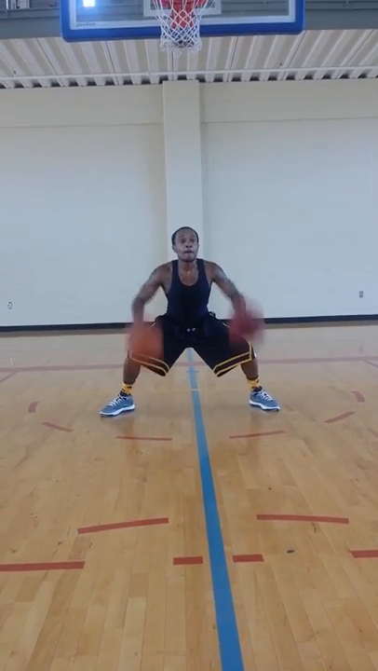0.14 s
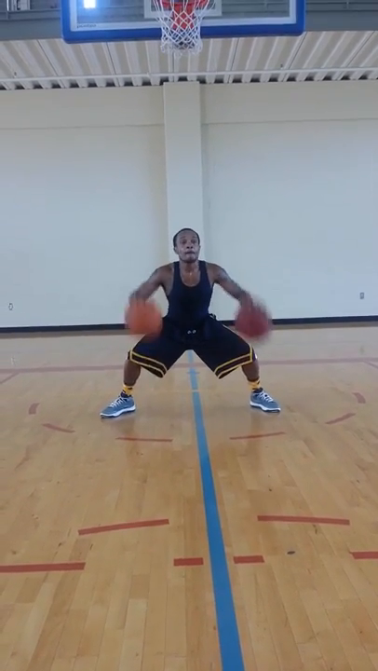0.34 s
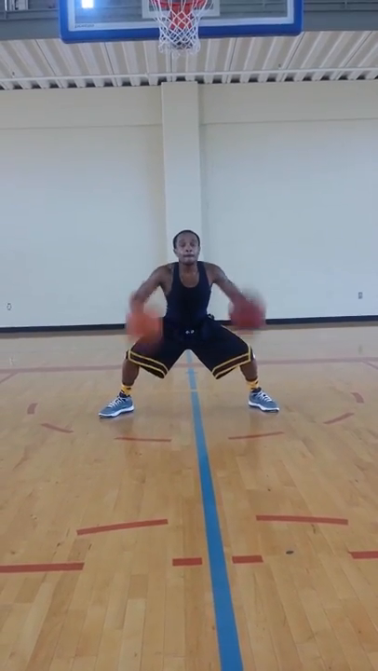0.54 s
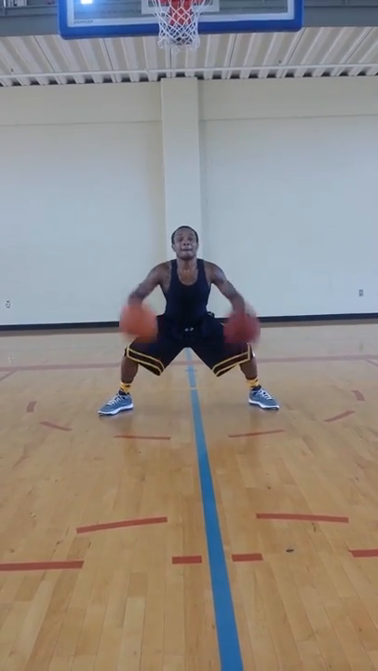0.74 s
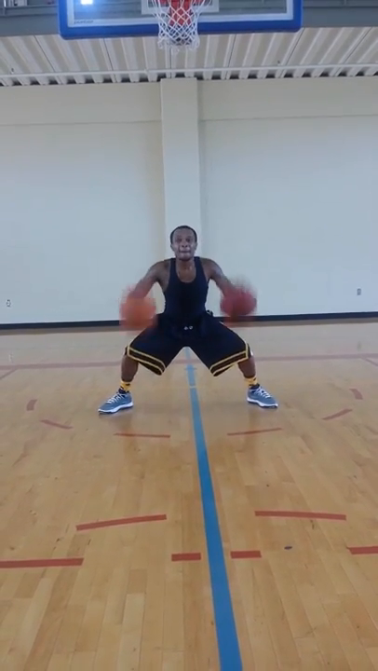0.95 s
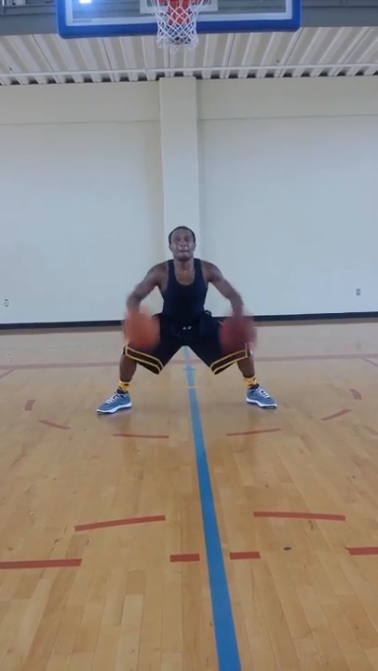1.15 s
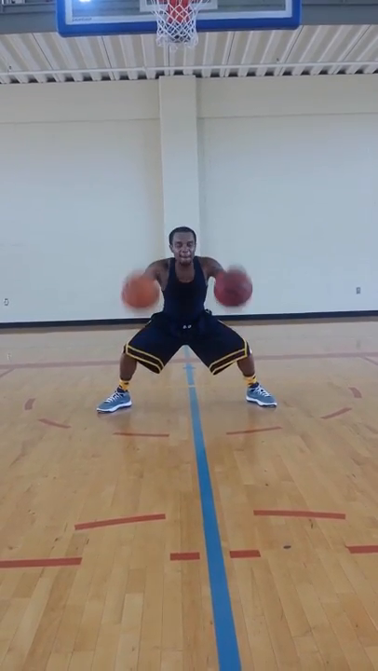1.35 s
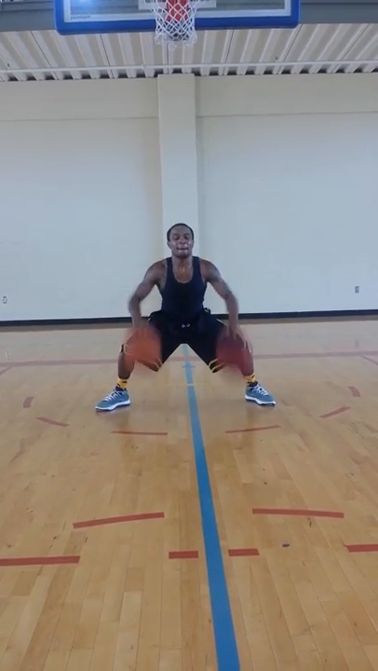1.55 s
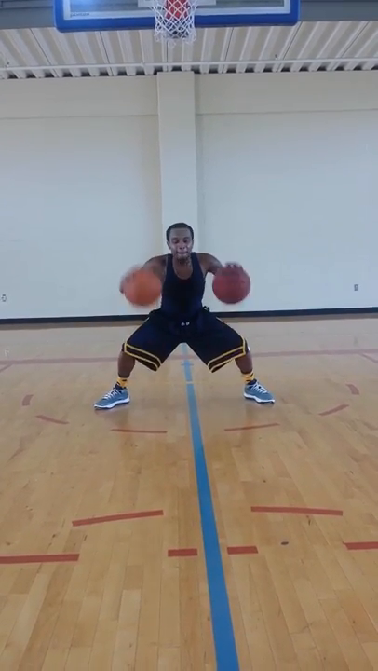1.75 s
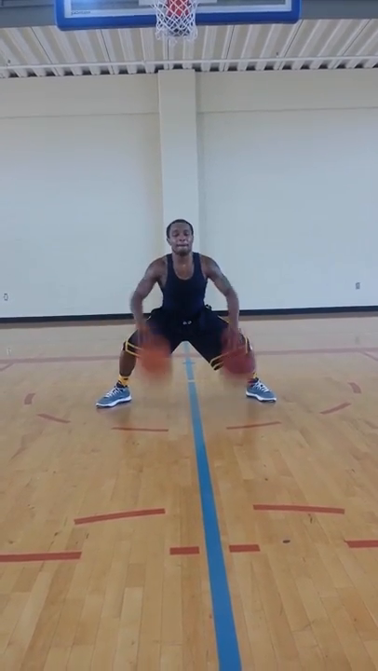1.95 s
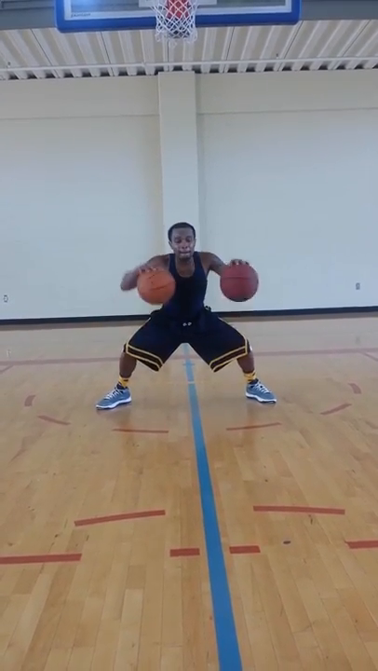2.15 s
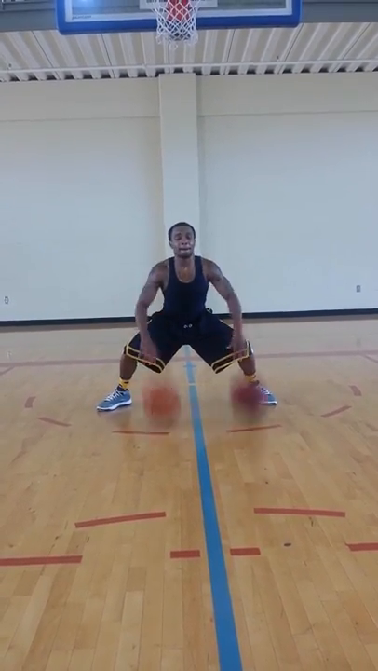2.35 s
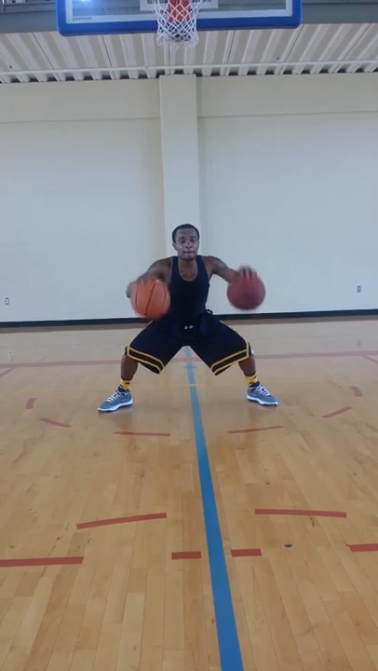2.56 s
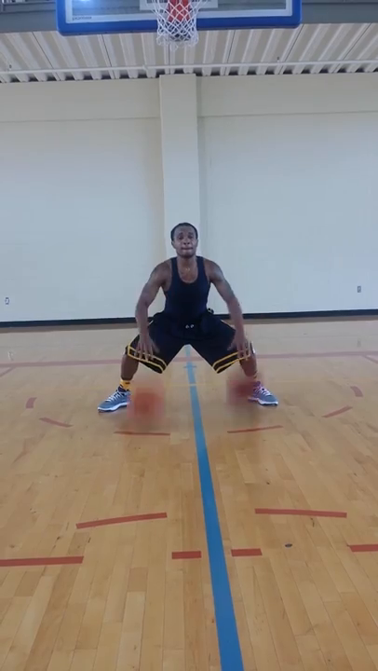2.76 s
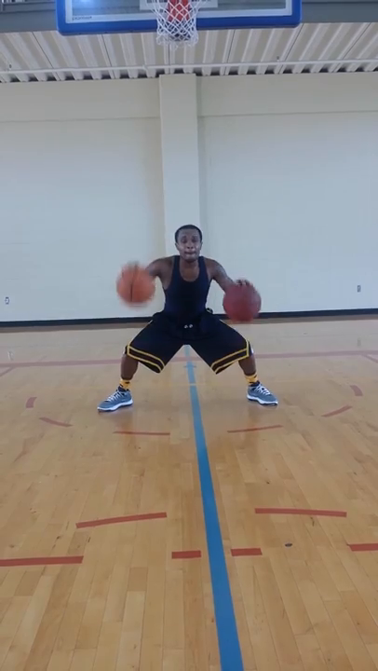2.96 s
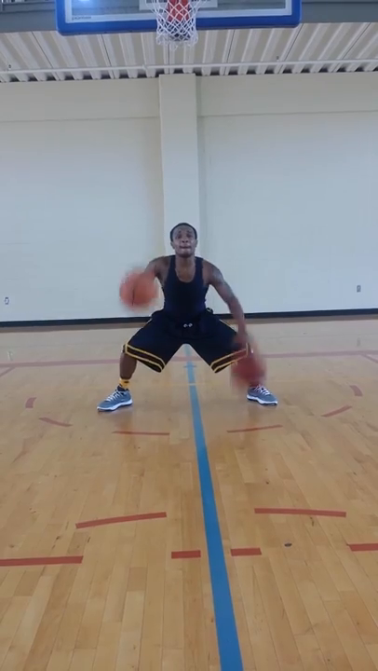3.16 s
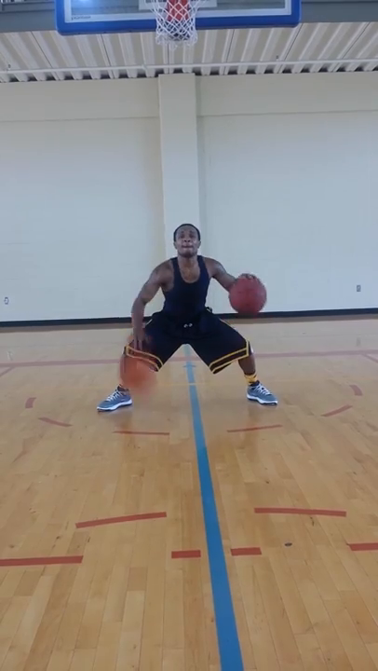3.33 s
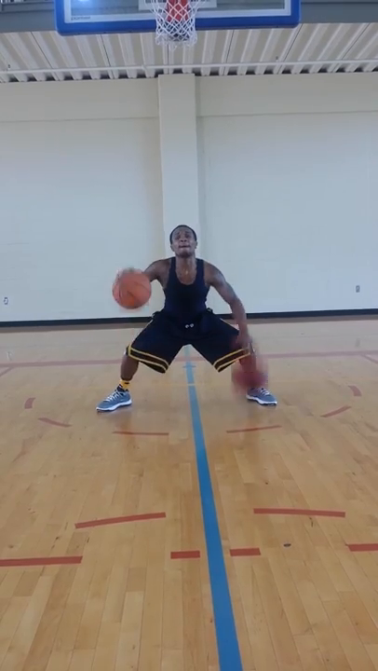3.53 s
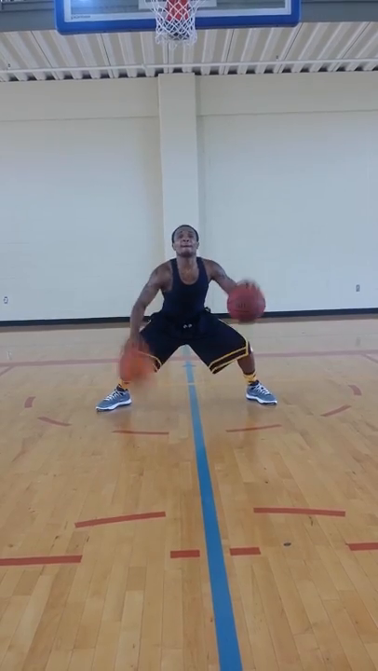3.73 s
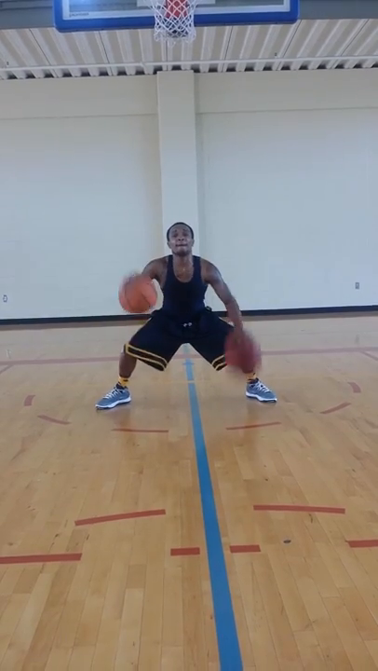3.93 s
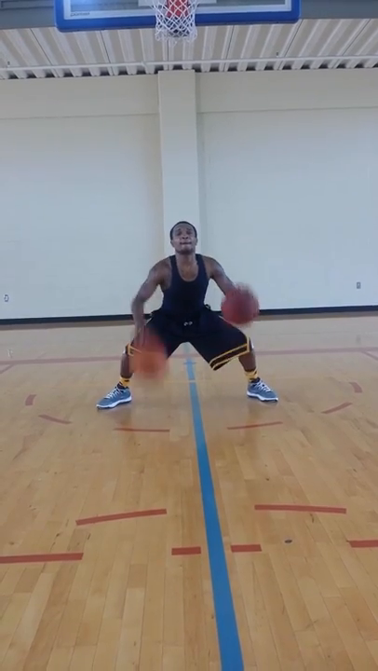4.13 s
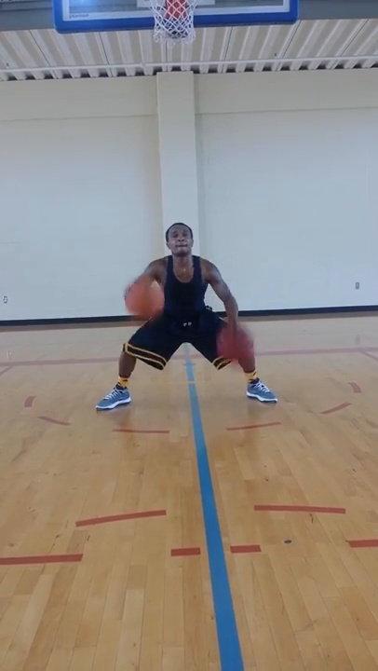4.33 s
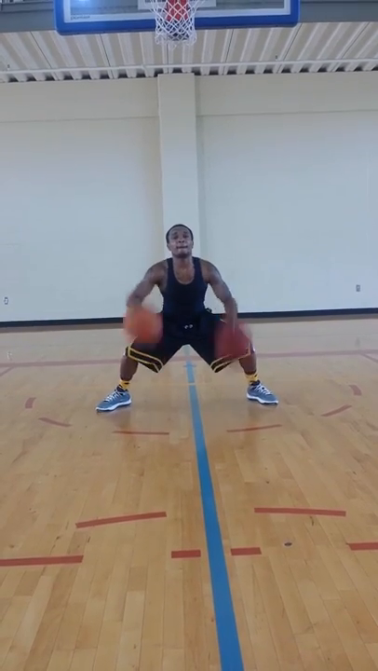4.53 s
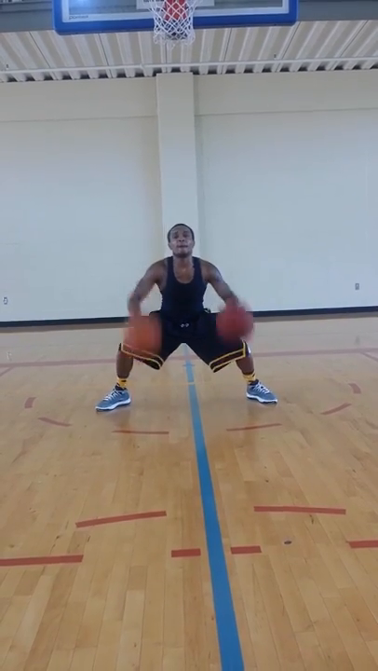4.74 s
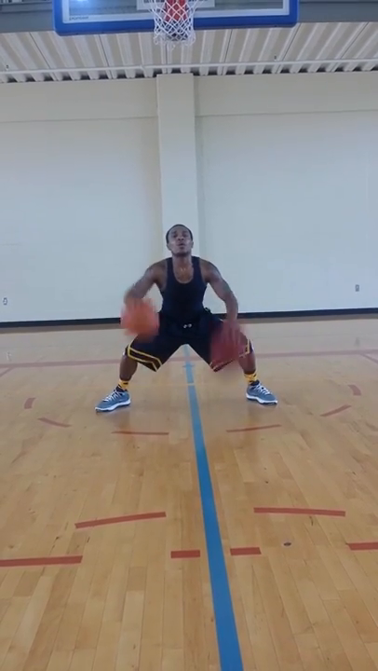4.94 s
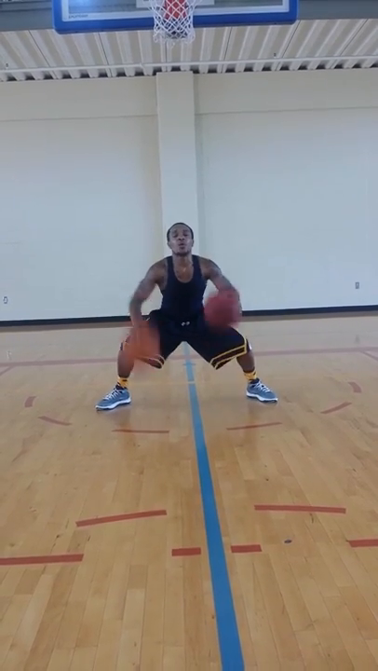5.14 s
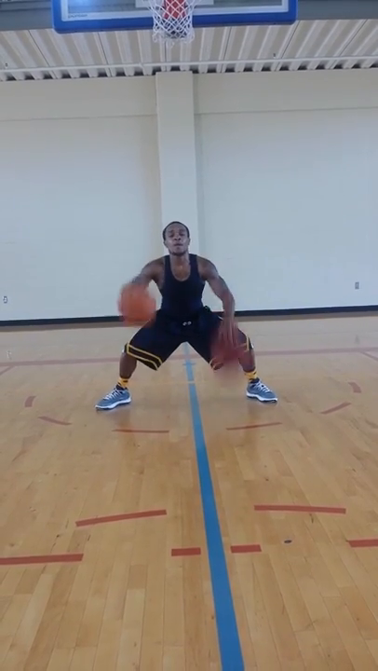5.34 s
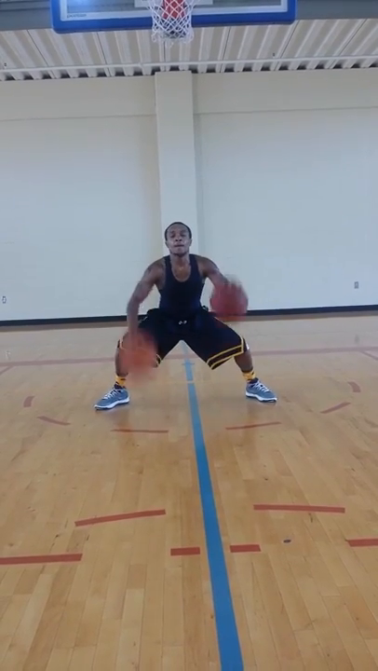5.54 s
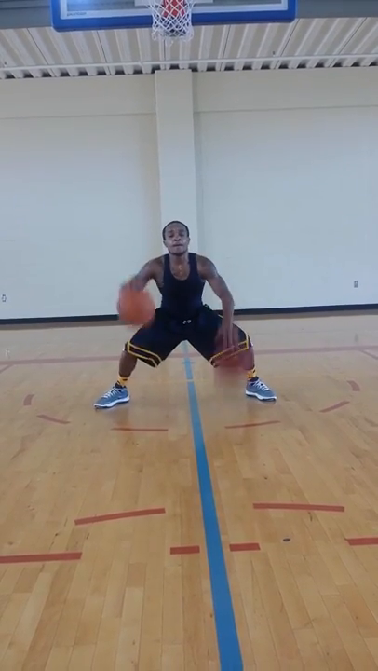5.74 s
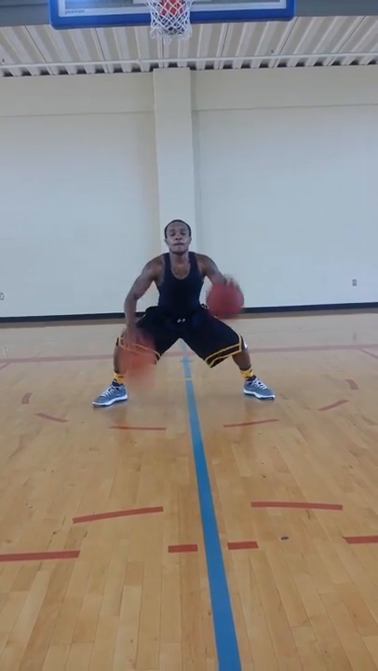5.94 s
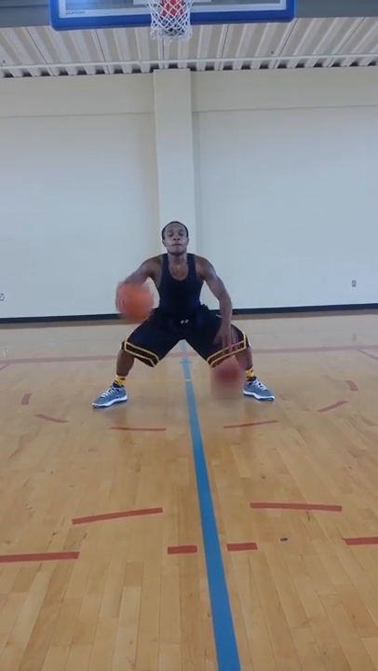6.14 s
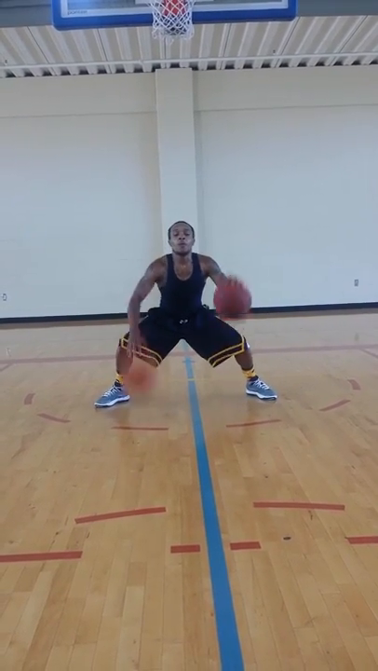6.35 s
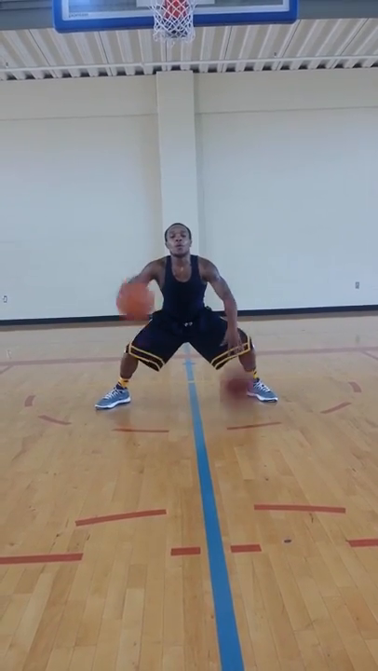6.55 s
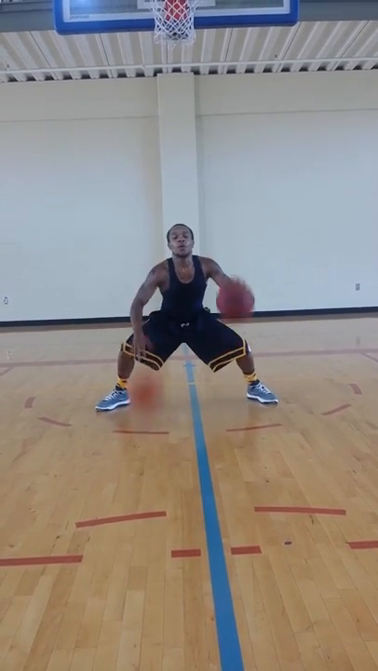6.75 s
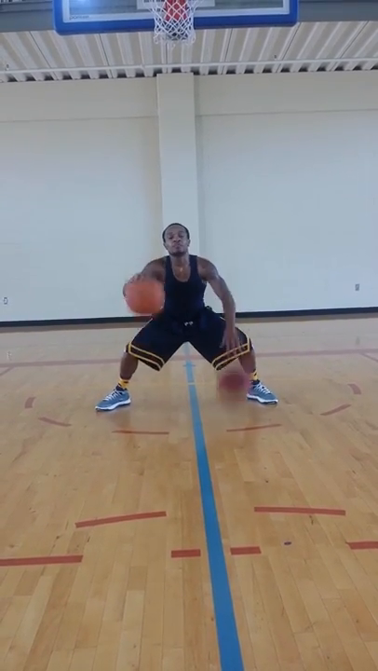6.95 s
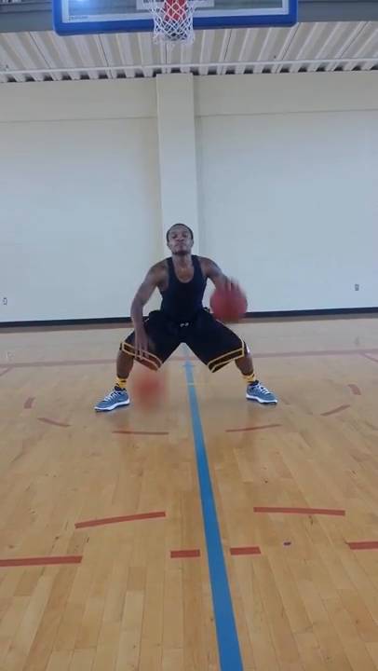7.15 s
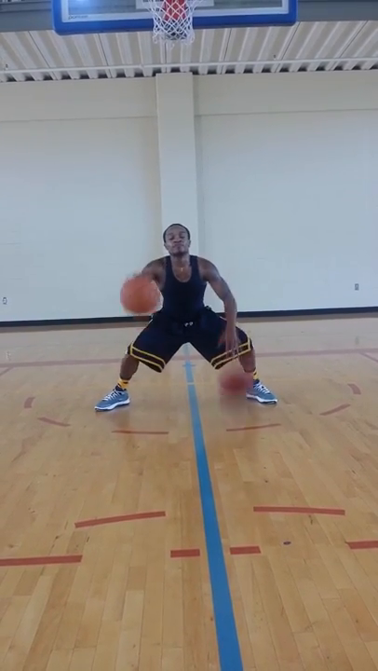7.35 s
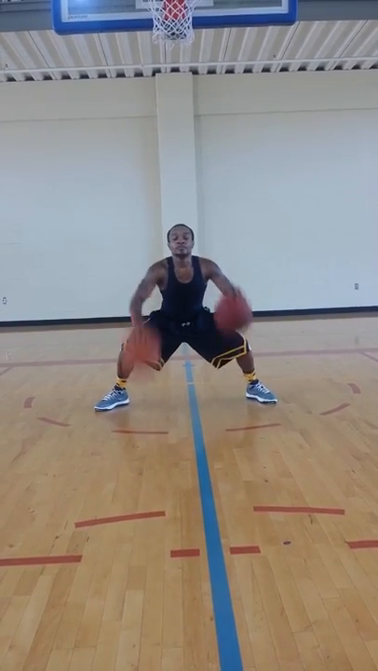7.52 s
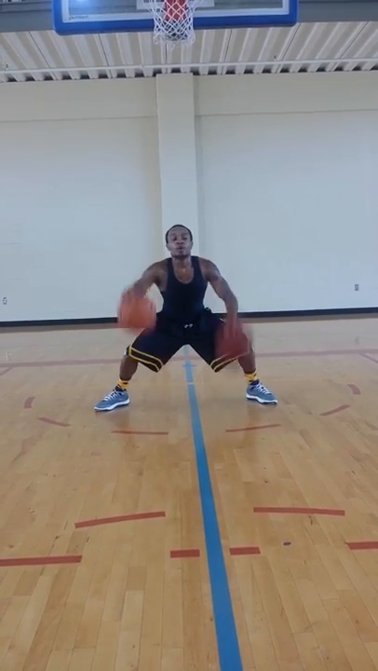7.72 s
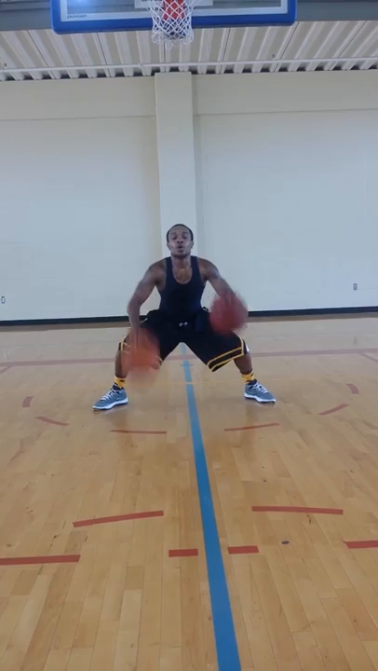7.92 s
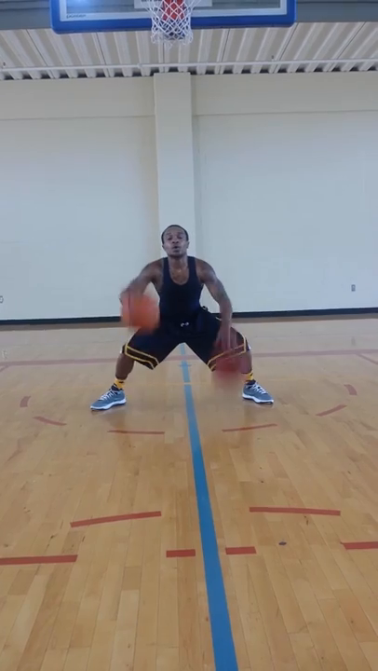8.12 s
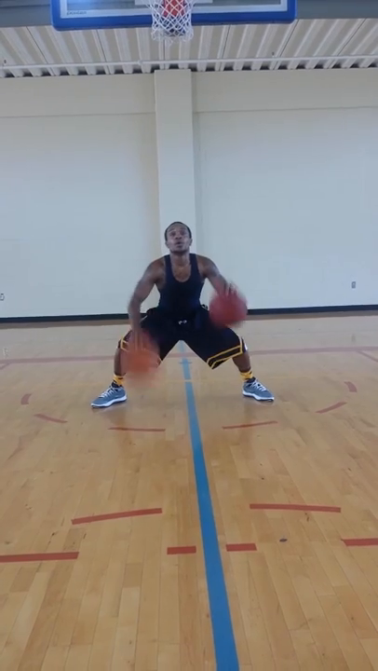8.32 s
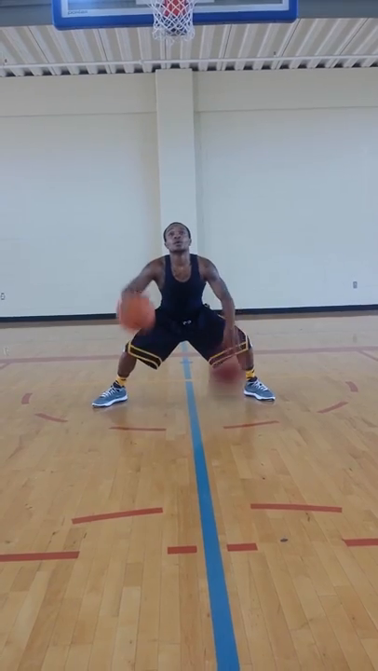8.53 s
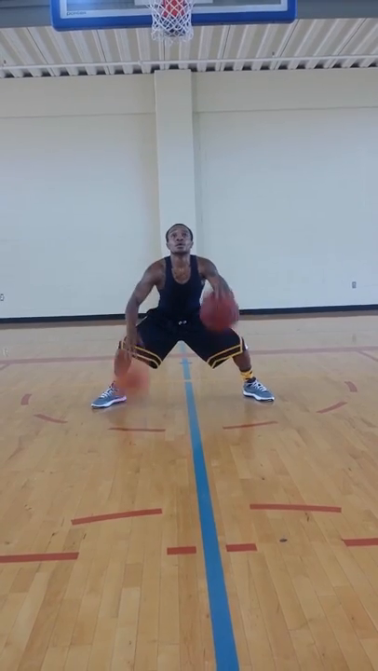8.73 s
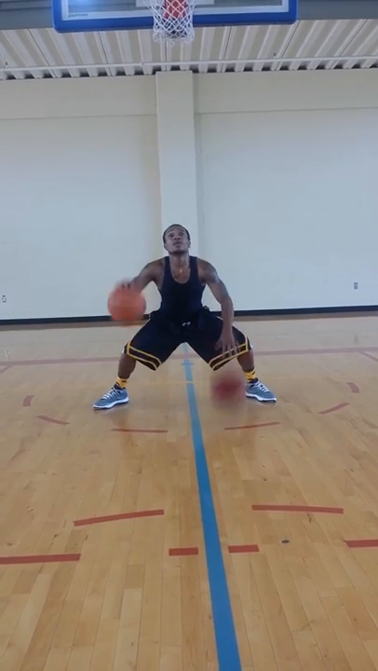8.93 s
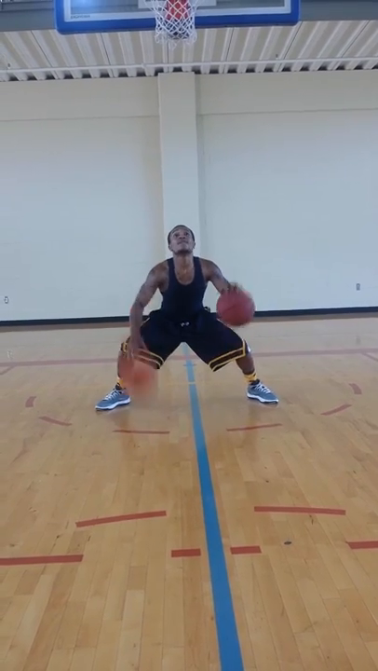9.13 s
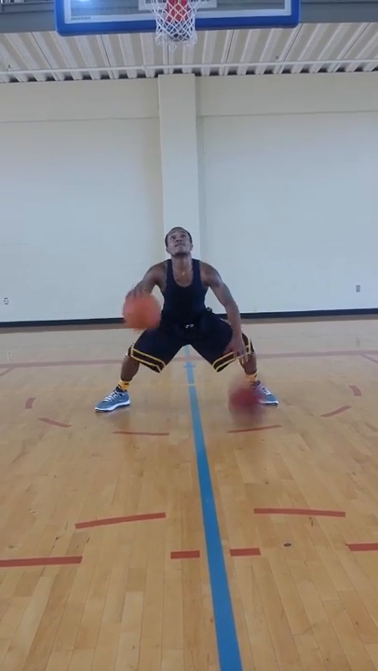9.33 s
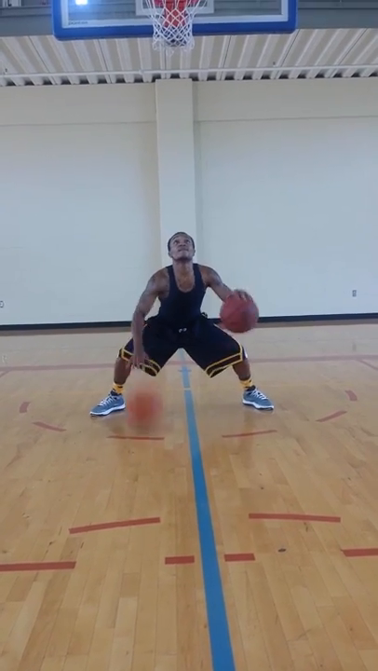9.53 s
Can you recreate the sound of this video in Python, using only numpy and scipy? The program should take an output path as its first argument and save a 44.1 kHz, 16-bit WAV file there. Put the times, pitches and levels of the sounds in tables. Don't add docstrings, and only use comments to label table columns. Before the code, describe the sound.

Bright, hard ball slaps on hardwood, heard at a distance by a stereo phone in an empty-sounding gym. Seven spaced, nearly simultaneous paired hits come first, then the two balls split into a regular left-right alternation, doubling the density. Short woody thumps sit under the cracks, with a small airy ping as balls lift. Echoes return from walls and roof and merge into a continuous hall wash over soft duct rumble.

```python
import sys
import numpy as np
from scipy import signal
from scipy.fft import rfft, irfft
from scipy.io import wavfile
from scipy.ndimage import uniform_filter1d

SR = 44100
rng = np.random.default_rng(int(sys.argv[2]) if len(sys.argv) > 2 else 0)


def persist_wave(psi):
    counts = np.round(np.clip(psi, -1, 1) * 32767).astype(np.int16)
    wavfile.write(sys.argv[1], SR, np.atleast_2d(counts).T)


def invert_db(level):
    return 10 ** (np.asarray(level, dtype=float) / 20)


N = 426888

LEAD = .25
SIZE = 4096
HZ = np.fft.rfftfreq(SIZE, 1 / SR)


def evened(x):
    return x / np.sqrt(np.mean(x ** 2) + 1e-20)


def read(points, hz):
    f, value = np.transpose(points)
    return np.interp(np.log(hz + 1), np.log(f + 1), value)


def causal(points):
    gain = np.log(invert_db(read(points, HZ)))
    mirrored = np.r_[gain, gain[-2:0:-1]]
    phase = signal.hilbert(mirrored).imag[:len(HZ)]
    return np.exp(gain - 1j * phase)


def late(ms):
    return np.exp(-2j * np.pi * HZ * ms / 1000)


def add(mix, s, spectrum):
    margin = 64
    at = (s + LEAD) * SR - margin
    delay_ms = (margin + at % 1) / SR * 1000
    sound = irfft(spectrum * late(delay_ms)) * signal.windows.tukey(SIZE, .03)
    part = mix[..., int(at):][..., :SIZE]
    part += sound[..., :part.shape[-1]]


def noise_pair(frames, magnitude):
    # pitch_hz, likeness (0-1)
    likeness = [(60, 0.99), (200, 0.96), (500, 0.67), (1000, 0.39), (3000, 0.022), (12000, 0.04)]
    a, b, c, d = rng.standard_normal((frames, 257, 4)).T
    hz = np.fft.rfftfreq(512, 1 / SR)[:, None]
    t = np.arange(frames) * 128 / SR
    same = np.clip(read(likeness, hz), -1, 1)
    left = a + 1j * b
    right = same * left + np.sqrt(1 - same ** 2) * (c + 1j * d)
    z = np.array([left, right])
    return signal.istft(z * magnitude(hz, t), nperseg=512, noverlap=384)[1]


def landing(row, ball):
    # pitch_hz, swing_start_ms, t60_after_liftoff_s
    boards = [
        (95.6, 1.04, 0.012),
        (101.5, 1.84, 0.017),
    ]
    # pitch_hz, level_db, t60_s
    ball_air = [
        [(541, 4, 0.016), (1132, 8.5, 0.0067), (1650, -25, 0.029), (2410, -30, 0.027)],
        [(557, -4, 0.047), (970, 8, 0.0052), (1278, 4, 0.0041), (2200, -44, 0.045)],
    ]
    # pitch_hz, level_db
    slap_colour = [(60, 12), (300, -8.5), (700, -3.5), (1500, 6.5), (2500, 5.5), (5000, -0.5), (9000, -2),
                   (14000, 4.5)]
    rest_ms = [
        13.9,
        13.1,
    ]
    # level_db at a 0 dB slap, gain_db per dB the slap is softer
    crack = [
        (-0.18, 1.12),
        (0.62, 0.24),
    ]

    s, slap_db, thump_db, lift_db = row
    contact_ms = rest_ms[ball]
    bite_db = crack[ball][0] - crack[ball][1] * slap_db
    hz, start_ms, t60 = boards[ball]
    t = np.arange(SIZE) / SR
    since = t - contact_ms / 1000 + 0.00047
    free = np.maximum(since, 0)

    turns = hz * (t - start_ms / 1000 + 0.17 * free)
    onset = 1 - np.exp(-t / 0.00099)
    thump = np.sin(2 * np.pi * turns) * onset * invert_db(thump_db - 0.5 - 60 * free / t60)

    chance = rng.uniform(-1.8, 1, (len(ball_air[ball]), 3))
    ring = 0
    for (f, db, r), (louder, sharper, turned) in zip(ball_air[ball], chance):
        phase = 2 * np.pi * f * (1 + 0.067 * sharper) * since + 1.5 * turned
        ring = ring + invert_db(db + 2 * louder - 60 * free / r) * np.cos(phase)

    rubber_hz = 6660
    grit = irfft(rfft(rng.standard_normal((2, SIZE))) / (1 + 1j * HZ / rubber_hz) ** 2)
    swell = np.exp(np.minimum(since, 0) / 0.0061)
    peel = invert_db(-60 * free / .016) * grit[0]
    lift = invert_db(lift_db - 5.5) * swell * (ring + invert_db(9.5) * peel)

    skin = grit[1] * invert_db(-16.5 - 60 * t / 0.018)
    for f, db, _ in ball_air[ball]:
        skin -= invert_db(-25 + db - 60 * t / 0.0031) * np.sin(2 * np.pi * f * t)
    skin[0] = -1.94
    bite = invert_db(bite_db * np.tanh(HZ / 5000))
    slap = invert_db(slap_db) * rfft(skin) * causal(slap_colour) * bite
    return slap, rfft(thump + lift)


def near(paths, stretch, shade):
    wobble = invert_db(2 * rng.standard_normal(len(paths)))
    edge = late(.06)
    total = 0
    for w, (ms, gain, thin, top_hz) in zip(wobble, paths):
        thinned = 1 - np.clip(thin, 0, 1) * edge
        total = total + w * gain * late(ms * stretch) * thinned / (1 + 1j * HZ / (top_hz * shade))
    return total


def arrival(ball):
    # delay_ms, gain, loss_of_lows (0-1), top_hz
    near_left = [(-.03, 0.69, 0.03, 3500), (.2, 0.11, 1, 8500), (.38, 0.33, 0.27, 3730),
                 (.72, 0.04, 0, 5000), (.9, 0.37, 0.73, 8900), (1.3, 0.022, 0, 9000), (1.45, 0.17, 1, 5030),
                 (1.89, 0.65, 0.6, 12800)]
    near_right = [(0, 0.97, 0, 20000), (.12, 0.024, 0.98, 9000), (.55, 0.033, 0.78, 3000),
                  (1.95, 0.014, 1, 9000)]
    # pitch_hz, width_hz, gain
    port = [
        [(2320, 78, 1), (6050, 210, 0.16)],
        [(2740, 330, 1), (5520, 340, 1)],
    ]
    port_shade = [
        1.0,
        0.6,
    ]
    stretch = 1 + 0.0035 * ball + 0.0049 * rng.standard_normal()
    ring = 1 + sum(gain / (1 + 2j * (HZ - hz) / width) for hz, width, gain in port[ball])
    left = near(near_left, stretch, port_shade[ball]) * ring
    right = near(near_right, stretch, 0.74)
    return np.array([left, right])


def hall(ball):
    # delay_ms, level_db
    walls = [(41, -6), (45.7, -2.5), (51, -.5), (72.5, -1), (76.5, -1.5), (88.5, -3.5), (102, -5.5),
             (157, -10)]
    # pitch_hz, level_db
    wall_colour = [(100, -11), (500, -0.5), (1200, -3.5), (2500, 3.5), (5000, 0), (9000, -3.5), (11500, -6),
                   (15000, -48)]
    # pitch_hz, t60_s
    hall_t60 = [(60, 2.6), (150, 1.3), (400, 1.63), (1000, 1.6), (3000, 3.24), (6000, 1.87), (10500, 0.73),
                (13500, 0.22)]
    # pitch_hz, level_db
    hall_colour = [(60, 9), (130, -3.5), (230, 7.5), (400, 4.5), (1000, 7), (2500, 5.5), (3800, 6),
                   (5500, 5.5), (9000, 5.5), (11000, 2), (12500, -6), (15500, -14)]

    clumps = uniform_filter1d(rng.standard_normal((257, 620)), 9, 0)
    clumps = evened(uniform_filter1d(clumps, 3, 1))

    def fading(hz, t):
        decay_db = 60 * t / read(hall_t60, hz)
        return invert_db(read(hall_colour, hz) - decay_db + 5.1 * clumps * np.exp(-t / 0.19))

    tail = noise_pair(620, fading)
    t = np.arange(tail.shape[1]) / SR
    build = np.clip((t - .039) / .011, 0, 1)
    dull = uniform_filter1d(tail, size=4)
    tail = build * tail + 0.33 * (1 - build) * dull
    tail *= invert_db(-4.5) / np.linalg.norm(tail[0])

    echoes, k = np.zeros((2, 9000)), np.arange(240)
    for ms, db in walls:
        grains = rng.standard_normal((2, 240))
        highs = grains - uniform_filter1d(grains, 30)
        scatter = 0.42 * highs * np.exp(-k / 60.) * np.tanh(k / 3.1)
        scatter += 0.46 * np.exp(-((k - 6) / 1.55) ** 2)
        echoes[:, round(ms * SR / 1000):][:, :240] += invert_db(db - 17.5) * scatter
    paths = arrival(ball)
    colour = irfft(causal(wall_colour) * paths / abs(paths[:, :1]))[:, :2048]
    tail[:, :9000] += signal.oaconvolve(echoes, colour, axes=1)[:, :9000]
    return tail


def bounces(rows, ball):
    length = N + round(LEAD * SR)
    direct, source = np.zeros((2, length)), np.zeros((2, length))
    even = np.clip((HZ - 400) / 500, 0, 1)
    for k, row in enumerate(rows):
        slap, body = landing(row, ball)
        add(direct, row[0], slap * arrival(ball) + body)
        sound = slap + body
        around = np.sqrt(uniform_filter1d(abs(sound) ** 2, size=40))
        smoothing = around / (abs(sound) + 0.15 * around)
        add(source[k % 2], row[0], sound * (1 - even + even * smoothing))
    wet = sum(signal.fftconvolve(x[None], hall(ball), axes=1)[:, :length] for x in source)
    return (direct + wet)[:, -N:]


def ventilation():
    # pitch_hz, level_db per Hz
    air = [(25, -25), (50, -17), (100, 5.5), (300, -6), (1000, -17), (4000, -15.5), (9000, -36),
           (13000, -72)]
    noise = noise_pair(N // 128 + 5, lambda hz, t: invert_db(read(air, hz)))
    return invert_db(-45.0) * evened(noise[:, :N])


def scene():
    # start_s, slap_peak_db, thump_db, liftoff_db
    right_ball = [(-0.125, 3, -20, -37), (0.2946, -9, -17.5, -32), (0.7137, -11, -34, -45),
                  (1.1244, -2, -13.5, -43), (1.5588, -1, -14.5, -39), (1.9736, -0.5, -17.5, -37),
                  (2.4062, -3.5, -16, -29), (2.8402, -23, -31, -32.5), (3.179, -4, -15.5, -31.5),
                  (3.552, -1, -14, -35), (3.9276, -3, -14.5, -32), (4.3091, -1.5, -16, -36),
                  (4.6949, -5, -16, -36), (5.0827, 0.5, -16.5, -31.5), (5.4756, -4, -15, -35),
                  (5.8669, -4, -16.5, -33.5), (6.2592, -0.5, -18.5, -34), (6.6486, -9.5, -16, -33.5),
                  (7.0563, -1, -14.5, -33), (7.453, -2.5, -17, -29.5), (7.8592, -0.5, -14.5, -33.5),
                  (8.2399, -7, -15.5, -31), (8.6341, -0.5, -14.5, -32), (9.02, -7.5, -17, -29.5),
                  (9.4078, -8.5, -17.5, -36.5)]
    left_ball = [(-0.122, -5.5, -17.5, -38), (0.2986, -2.5, -19, -40), (0.7146, 4.5, -8.5, -30),
                 (1.128, -1.5, -27, -31), (1.5601, -4, -16.5, -33.5), (1.9769, -4.5, -27, -30),
                 (2.4175, -7.5, -19, -51), (2.8405, -6.5, -11.5, -30.5), (3.3568, 0, -15.5, -30.5),
                 (3.7491, -1.5, -13, -33.5), (4.1398, -5, -14.5, -32.5), (4.5189, -2.5, -12.5, -33),
                 (4.9078, -1.5, -14, -33), (5.2939, -3, -15, -31.5), (5.684, -7, -18, -35.5),
                 (6.079, -5.5, -15, -35), (6.4666, -4.5, -18, -63), (6.8557, -5.5, -16.5, -38.5),
                 (7.2629, -1.5, -14.5, -29.5), (7.6615, -0.5, -15.5, -36), (8.0571, -2.5, -14, -32.5),
                 (8.4545, -4.5, -16.5, -42), (8.836, -2.5, -16.5, -36.5), (9.2415, -8, -17.5, -36),
                 (9.614, -7.5, -16.5, -33.5)]
    return bounces(right_ball, ball=0) + bounces(left_ball, ball=1) + ventilation()


def band_limit(x):
    return signal.sosfilt(signal.butter(12, 16620, fs=SR, output="sos"), x)


def record(dry):
    # pitch_hz, level_db
    left_mic = [(18, -25), (35, -8), (70, -0.5), (300, 10.5), (1000, 5.5), (2300, 4), (3700, 1), (5000, 5),
                (5900, 8.5), (7000, 1.5), (8500, -4), (11000, -16), (15000, -12), (17000, -49)]
    right_mic = [(18, -27), (35, -7.5), (70, -2.5), (300, 7.5), (1500, 1), (3500, -4), (5500, -3.5),
                 (7500, 0), (10000, -4), (13000, -9), (15500, -30), (17000, -37)]
    mics = irfft([causal(left_mic), causal(right_mic)]) * np.hanning(2 * SIZE)[SIZE:]
    heard = signal.oaconvolve(dry, mics, axes=1)[:, :N]
    limited = heard / (1 + (heard / .93) ** 6) ** (1 / 6)
    return band_limit(limited)


dry = scene()
out = record(dry)
persist_wave(out)
```